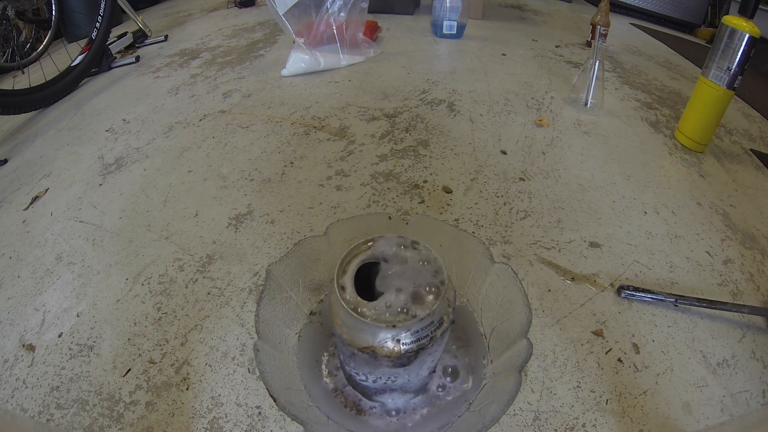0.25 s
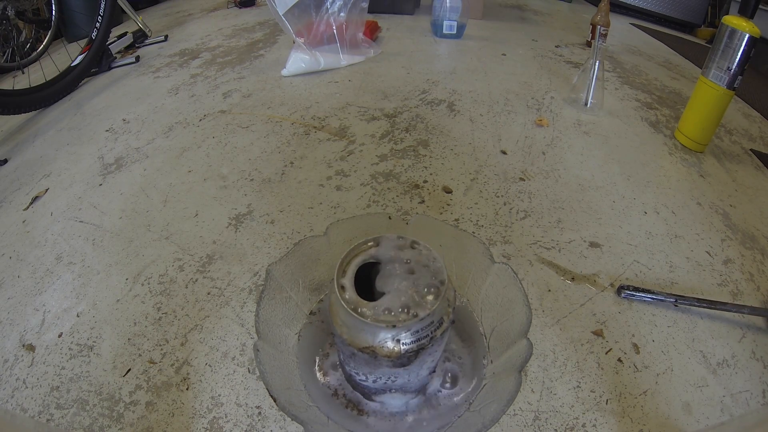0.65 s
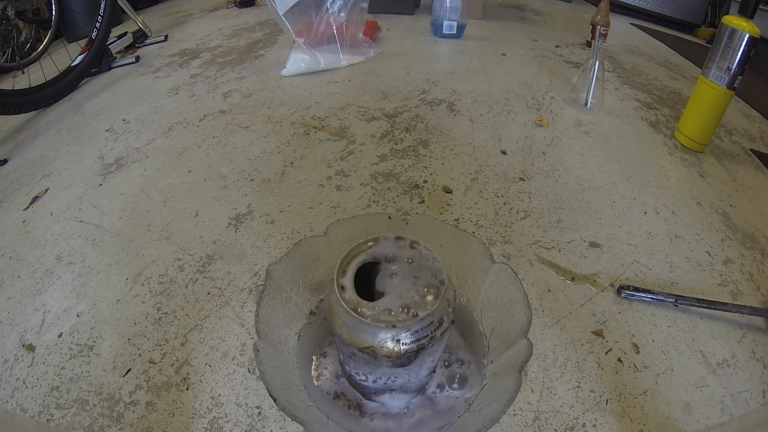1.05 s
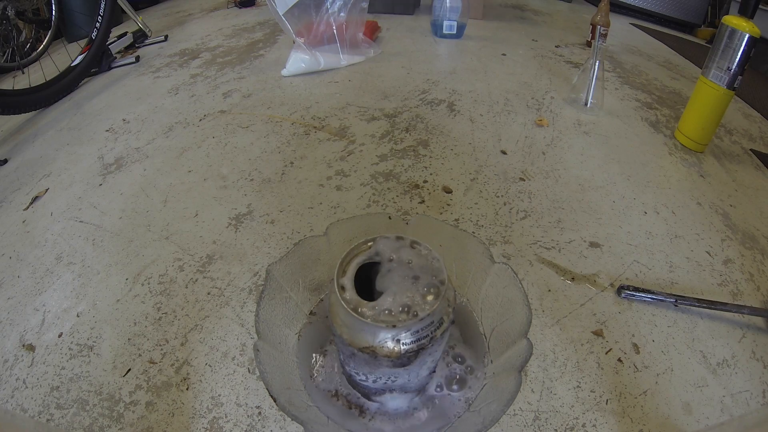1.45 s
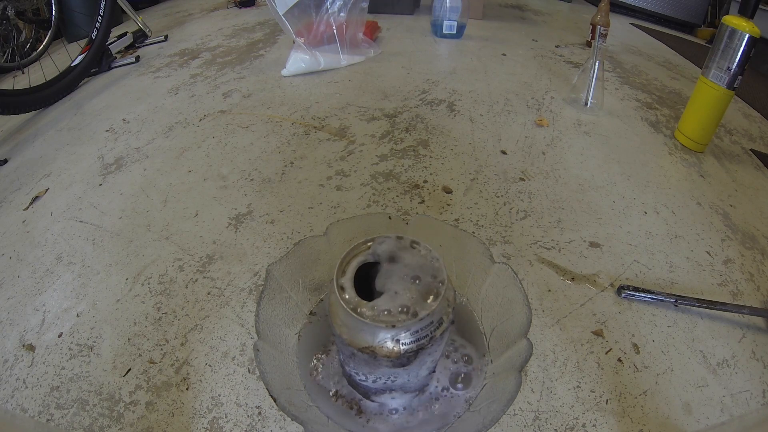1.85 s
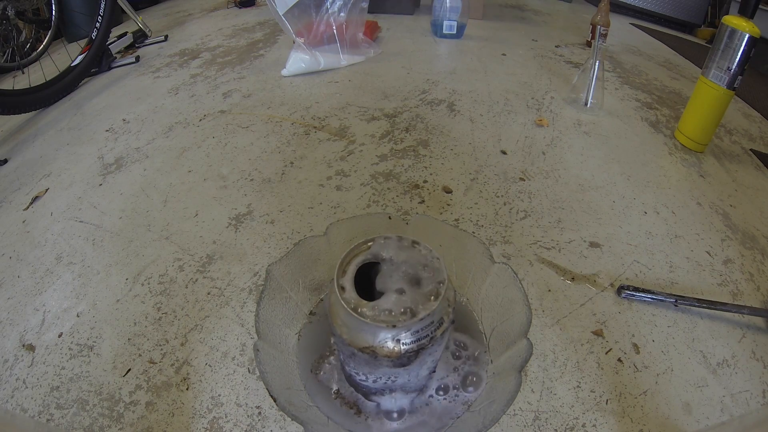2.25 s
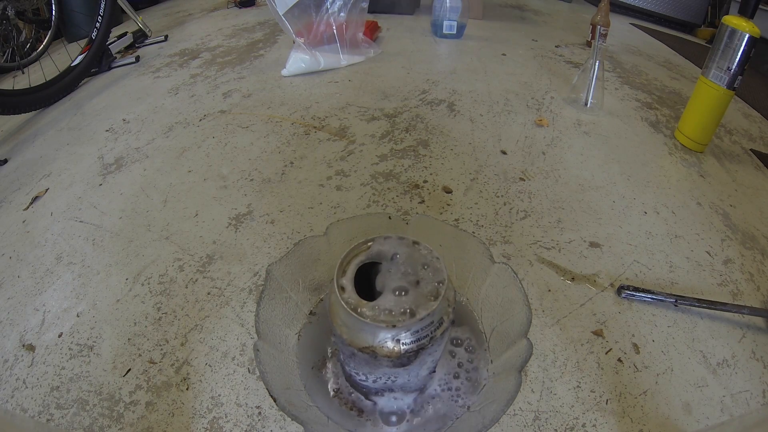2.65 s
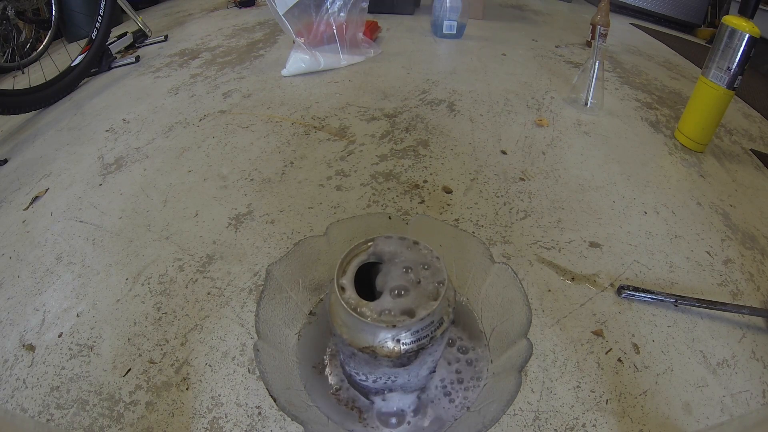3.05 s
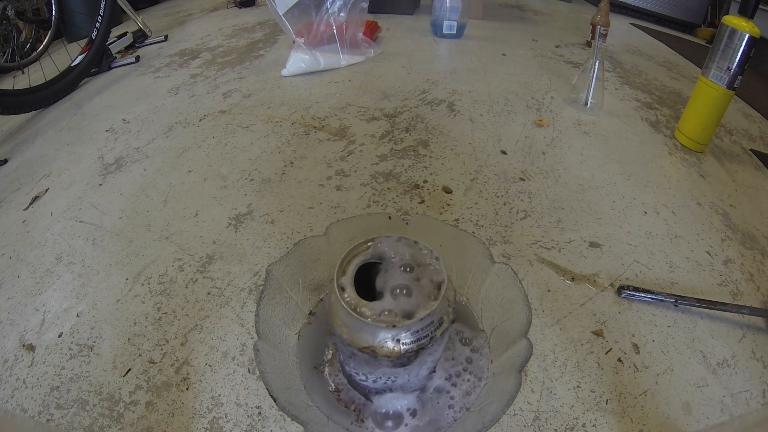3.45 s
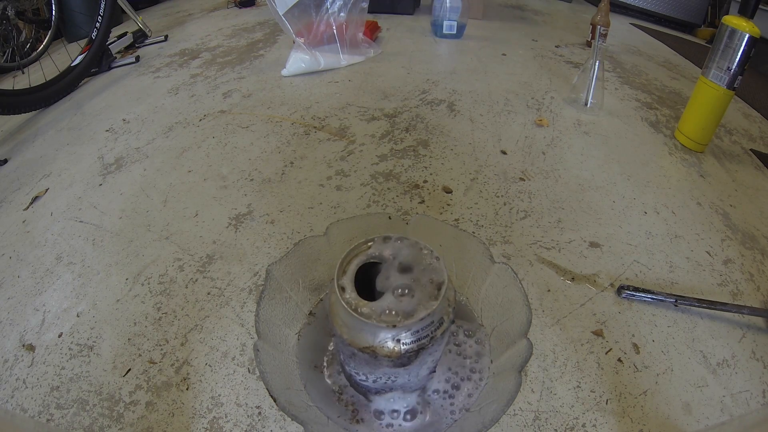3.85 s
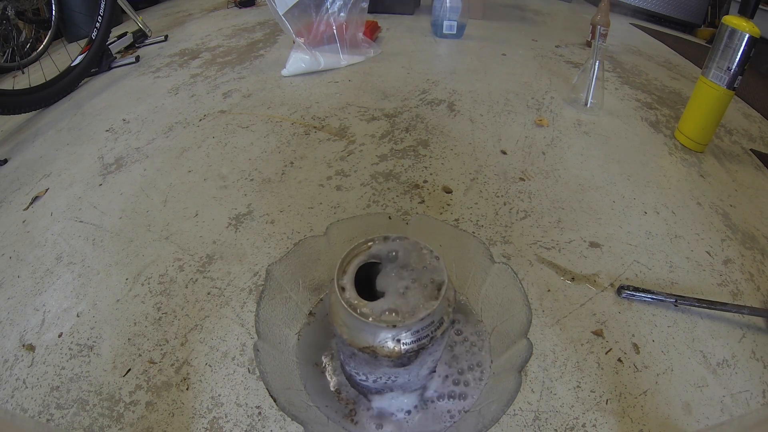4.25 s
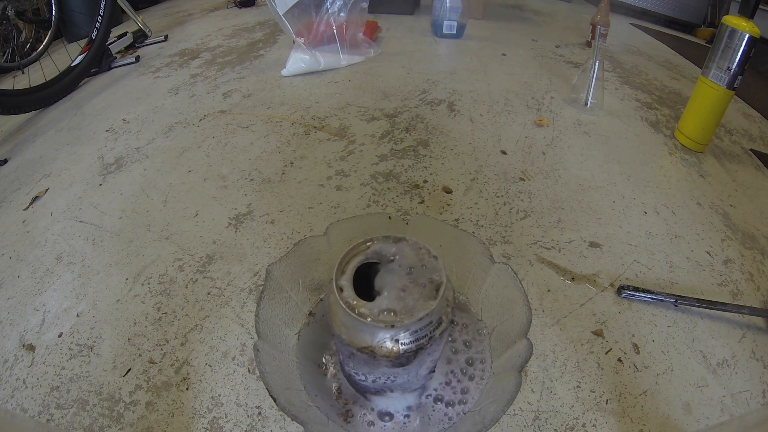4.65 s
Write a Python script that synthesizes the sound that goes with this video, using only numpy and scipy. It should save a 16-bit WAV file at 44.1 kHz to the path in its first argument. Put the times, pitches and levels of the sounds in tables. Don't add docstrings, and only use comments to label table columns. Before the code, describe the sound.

For about five seconds, a dense, fine fizz of bursting bubbles surrounds a metal can in a glass bowl, close to a small housed camera microphone in a garage. The hiss is constant but flutters in quick uneven surges, with a hollow ringing around the can's opening, glassy treble colour and occasional faint clumps of very high ticks. Beneath it sit a low motor hum, a deep bench vibration, soft air rumble and a barely audible thin electronic whine. At about 1.65 seconds a big bubble gives a short, rounded glug, answered by two small plinks near 1.7. From about 1.9 seconds the highest treble becomes patchy, watery and darker. A soft double glug, the second higher, comes near 2.57. Low shaking swells around 2.9 and hardest at 3.75; air rumble rises near 3.3 and 3.6. The fizz continues to the end, very slightly stronger.

```python
import sys
import numpy as np
from scipy import signal
from scipy.fft import rfft, irfft
from scipy.io import wavfile
from scipy.ndimage import uniform_filter1d

SR = 44100
rng = np.random.default_rng(int(sys.argv[2]) if len(sys.argv) > 2 else 0)


def bounce(signal):
    frames = np.transpose(np.atleast_2d(signal))
    limited = np.clip(frames, -1, 1)
    pcm = np.round(limited * 32767).astype(np.int16)
    wavfile.write(sys.argv[1], SR, pcm)


def volts(x):
    e = np.asarray(x, float) / 20
    return 10 ** e


N = 211724

# f/Hz, width/Hz, level/dB
CAN_AIR = [(1274, 105, -3), (1407, 130, 2), (1504, 140, -6.5), (1623, 74, -4.5), (1770, 200, -8.5)]
# f/Hz, width/Hz, level/dB
GLASS_RINGS = [(2364, 200, -2), (2520, 310, -5), (2980, 240, -7), (3480, 420, -2), (3790, 150, 0),
               (5076, 204, 1.5), (6450, 600, -5), (7530, 600, -5.5), (8240, 180, -10), (8580, 400, -9),
               (10200, 430, -7.5), (10920, 630, -5), (12840, 700, -11)]
# f/Hz, level/dB
HISS_COLOUR = [(700, -24), (1500, 0), (2100, -2.5), (3900, -5.5), (4200, -7), (9500, -7), (11500, -9.5),
               (13500, -12.5), (15000, -14), (15200, -18), (15900, -20)]
# f/Hz, width/Hz, level/dB
FLECK_RING = [(11220, 110, 0)]
# t/s, level/dB
FLECK_CLUMPS = [(.035, -66), (.205, -66), (.365, -68), (.445, -67), (.69, -68), (1.235, -67), (1.749, -60),
                (1.785, -64), (1.945, -63), (2.0, -64), (2.2, -66), (2.256, -65), (2.44, -64), (2.56, -64),
                (2.694, -64), (2.86, -62), (3.11, -68), (4.743, -62), (4.785, -67)]
# f/Hz, level per Hz/dB
ROOM_AIR = [(4, -26), (8, 2), (20, -1), (40, 4), (65, -1), (100, -9), (170, -12.5), (260, -17.5),
            (360, -20), (600, -23), (1100, -27), (1500, -41)]
# t/s, level over the steady rumble/dB, half length/s
AIR_SWELLS = [
    (.28, 2.5, 0.089),
    (1.19, 1, 0.062),
    (1.42, 3, 0.13),
    (2.12, 0, .08),
    (2.43, 1, 0.093),
    (2.97, 1, .1),
    (3.3, 6.5, .07),
    (3.62, 6, .07),
    (4.03, 3.5, .12),
    (4.634, -3, 0.089),
]
# f/Hz, level/dB
MOTOR_HUM = [(60.4, -54.5), (200.4, -59), (267.1, -55), (335.7, -67), (241.4, -65), (294, -66.5)]
# f/Hz, level/dB
CAMERA_WHINE = [(6594, -82), (9410, -86), (9890, -85), (10429, -85), (12647, -85)]
# f/Hz, level/dB
SHAFT_SHAKE = [(28.6, -49)]
# t/s, level over the steady shake/dB, half length/s
HARD_SHAKES = [
    (.65, 4, .08),
    (2.155, 4.5, .1),
    (2.42, 2, .1),
    (2.94, 8.5, 0.14),
    (3.75, 9.5, 0.088),
    (4.62, 4, 0.09),
]
# t/s, peak level/dB, f/Hz, t60/s
BIG_BUBBLES = [
    (1.6558, -33.5, 481, 0.039),
    (2.561, -42, 530, 0.04),
    (2.584, -38.5, 555, 0.042),
]
# t/s, peak level/dB, f/Hz, t60/s
CAN_KNOCKS = [
    (1.681, -32.5, 1290, 0.029),
    (1.702, -41, 1424, 0.035),
]
# f/Hz, share/0-1
TREBLE_GAPS = [(11500, 0), (12800, .08), (13400, .45), (14500, .66), (14850, .66), (15120, 1)]

FOAM_DB, FOAM_GROWS_DB_PER_S = -46.5, 0.12
SURGE_EVENED_S = 0.14
CAN_DB = -2
CAN_STIRRED_DB, CAN_STIRRED_S = -11, 0.05
FLECKS_DB, CLUMPS_LIFT_DB, CLUMP_HALF_S = -75, 1, 0.016
ROOM_DB, RUMBLE_DB, RUMBLE_RISE_S = -47, -45.5, 0.06
GAPS_START_S = 1.9


def shape(x, points=(), modes=()):
    hz = np.maximum(np.fft.rfftfreq(N, 1 / SR), 1)
    power = 1e-18 * hz
    if len(points):
        point_hz, point_db = np.transpose(points)
        power = power + volts(np.interp(np.log(hz), np.log(point_hz), point_db, -80, -80)) ** 2
    for centre, width, db in modes:
        power = power + volts(db) ** 2 / (1 + (1.46 * (hz - centre) / width) ** 2) ** 2
    y = irfft(rfft(x) * np.sqrt(power), N)
    return y / np.std(y)


def walk(rate):
    hold = int(SR / rate)
    steps = np.repeat(rng.standard_normal(N // hold + 1), hold)
    return 0.92 * uniform_filter1d(steps, hold)[:N]


def swells(base_db, events):
    t = np.arange(N) / SR
    rises = sum(volts(db) ** 2 * np.exp(-((t - s) / half) ** 2) for s, db, half in events)
    return np.sqrt(volts(base_db) ** 2 + rises)


def bursts(per_s, spread_db):
    size_luck, time_luck, sign_luck = rng.random((3, N))
    size = volts(-spread_db * np.log(size_luck + 1e-9))
    return (time_luck < per_s / SR) * size * np.sign(sign_luck - 0.5)


def fizz():
    surge = walk(22.03)
    surge = 1.2 * (surge - uniform_filter1d(surge, int(SURGE_EVENED_S * SR)))
    can = shape(bursts(per_s=5000, spread_db=2.1), modes=CAN_AIR)
    hiss = shape(bursts(per_s=16000, spread_db=1.17), HISS_COLOUR, GLASS_RINGS)
    flecks = shape(bursts(per_s=1500, spread_db=0.0), modes=FLECK_RING)

    stir_s = BIG_BUBBLES[0][0] + CAN_STIRRED_S / 2
    stirred = swells(CAN_DB, [(stir_s, CAN_STIRRED_DB, CAN_STIRRED_S)])
    clumps = swells(FLECKS_DB, [(s, db + CLUMPS_LIFT_DB, CLUMP_HALF_S) for s, db in FLECK_CLUMPS])
    foam = volts(FOAM_DB + FOAM_GROWS_DB_PER_S * np.arange(N) / SR)
    surging = can * stirred * volts(0.52 * surge) + hiss * volts(0.5 * surge - 3.5)
    return foam * surging + flecks * clumps


def room():
    air = shape(rng.standard_normal(N), ROOM_AIR)
    low = signal.sosfilt(signal.butter(4, 100, fs=SR, output="sos"), air)
    high = signal.sosfilt(signal.butter(4, 100, "high", fs=SR, output="sos"), air)
    rise = np.minimum(np.arange(N) / SR / RUMBLE_RISE_S, 1) ** 2
    gusts = volts(RUMBLE_DB) * swells(0, AIR_SWELLS) * rise
    tone_level = volts(ROOM_DB - 0.5 + 0.67 * walk(5.67))
    return low / np.std(low) * gusts + high / np.std(high) * tone_level


def tones(table, wobble_db, drift):
    t = np.arange(N) / SR
    out = np.zeros(N)
    for hz, db in table:
        level = np.sqrt(2) * volts(db + wobble_db * walk(4.23))
        out += level * np.sin(2 * np.pi * hz * t + drift * walk(2.895))
    return out


def motor():
    shake = tones(SHAFT_SHAKE, wobble_db=1.7, drift=0.6) * swells(0, HARD_SHAKES)
    return tones(MOTOR_HUM, wobble_db=1.5, drift=0.58) + shake


def bubbles(table, wall, splash_db):
    out = np.zeros(N)
    t = np.arange(int(0.12 * SR)) / SR
    for s, db, hz, t60 in table:
        turn = 2 * np.pi * hz * (t + 1.2 * t ** 2)
        answer = np.sin(0.873 * turn) + 0.94 * np.sin(1.2 * turn) + 0.66 * np.sin(2.06 * turn)
        decay = np.exp(-np.log(1000) * t / t60)
        attack = 1 - np.exp(-t / 0.0015)
        ring = (np.sin(turn) + wall * answer) * decay * attack
        dull_noise = signal.lfilter([1], [1, -0.9], rng.standard_normal(len(t)))
        splash = dull_noise * np.exp(-t / 0.01)
        i = int((s - 0.002) * SR)
        out[i:i + len(t)] += volts(db + 3.0) * ring + volts(db + splash_db) * splash
    return out


def scene():
    whine = tones(CAMERA_WHINE, wobble_db=0.72, drift=0.4)
    glugs = bubbles(BIG_BUBBLES, wall=0.55, splash_db=-21)
    plinks = bubbles(CAN_KNOCKS, wall=0.1, splash_db=-32)
    return (fizz() + room() + motor() + whine + glugs + plinks)[None]


def patchy_treble(dry):
    hz, s, cells = signal.stft(dry[0], SR, nperseg=2048, noverlap=1536)
    luck = uniform_filter1d(rng.standard_normal(cells.shape), size=4, axis=0)
    luck = uniform_filter1d(luck, size=6, axis=1)
    rank = luck.ravel().argsort().argsort().reshape(luck.shape) / luck.size
    share = np.interp(hz, *np.transpose(TREBLE_GAPS))[:, None]
    late = s > GAPS_START_S
    empty = (rank < share) & late
    lift = np.where(late, 1 / np.sqrt(1.05 - share), 1)
    return signal.istft(cells * lift * ~empty, SR, nperseg=2048, noverlap=1536)[1][None, :N]


def band_limit(x):
    return signal.sosfilt(signal.butter(12, 15725, fs=SR, output="sos"), x)


def record(dry):
    mix = patchy_treble(dry)
    return band_limit(mix)


dry = scene()
out = record(dry)
bounce(out)
```